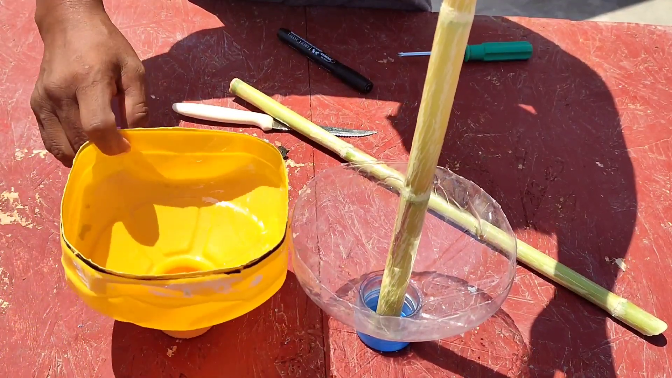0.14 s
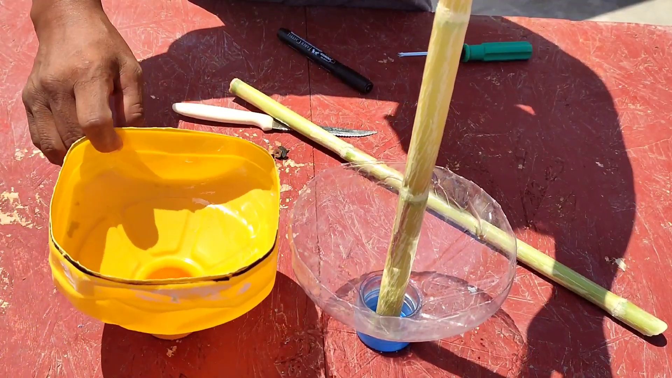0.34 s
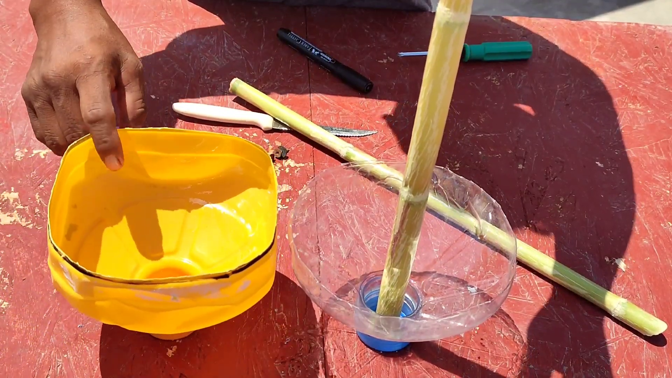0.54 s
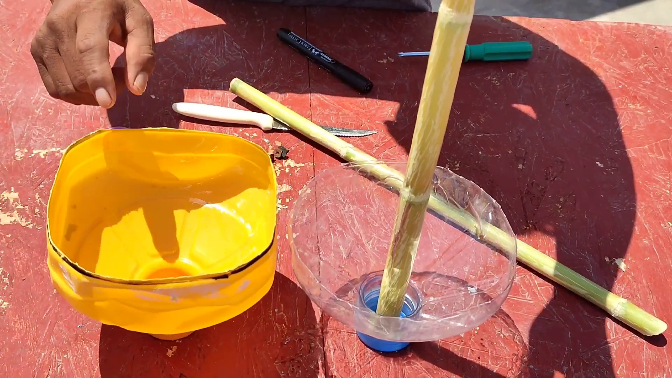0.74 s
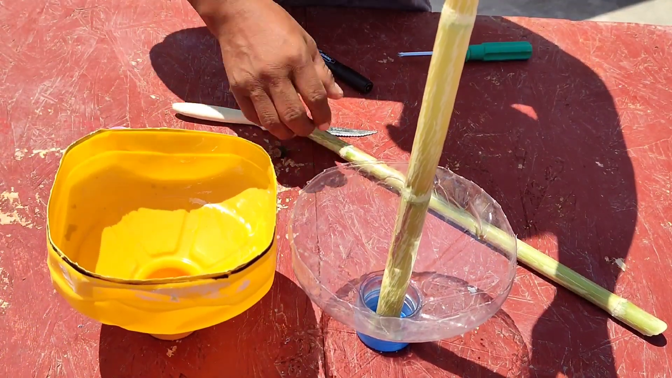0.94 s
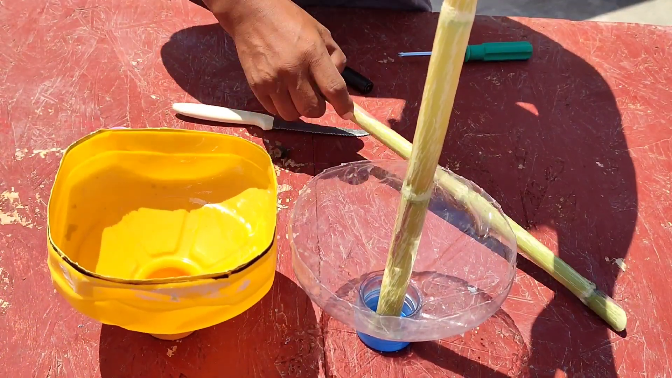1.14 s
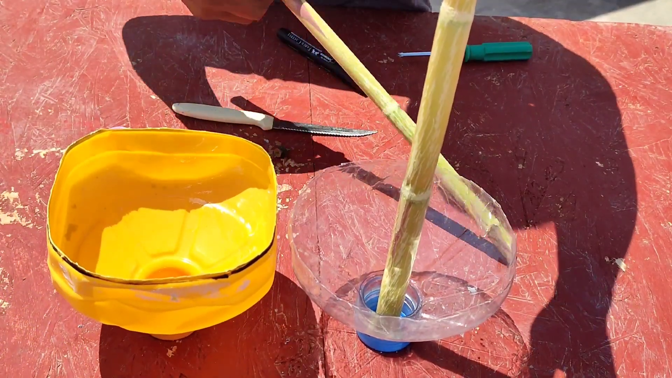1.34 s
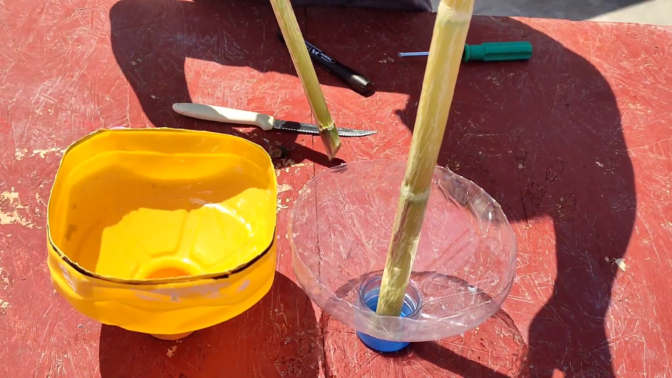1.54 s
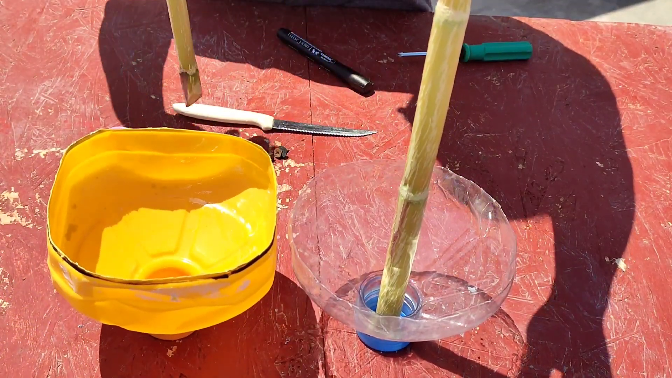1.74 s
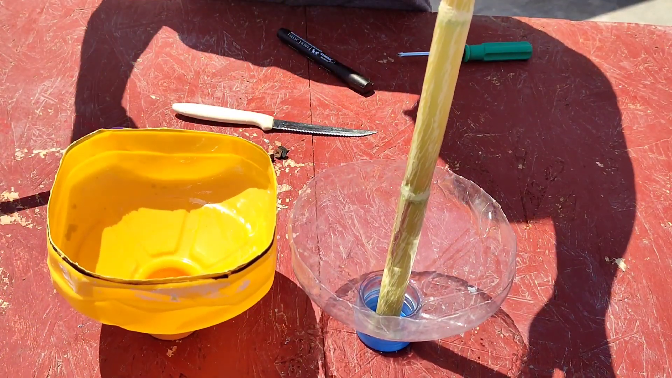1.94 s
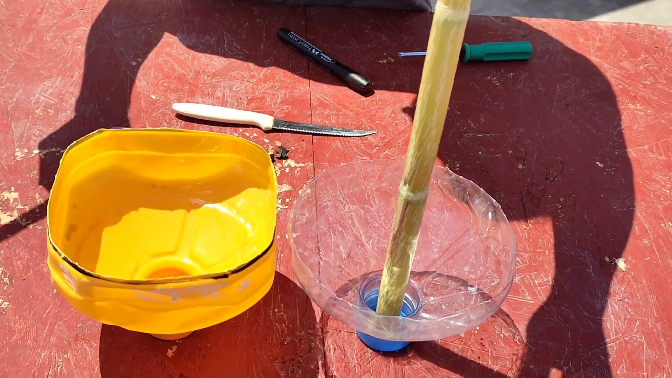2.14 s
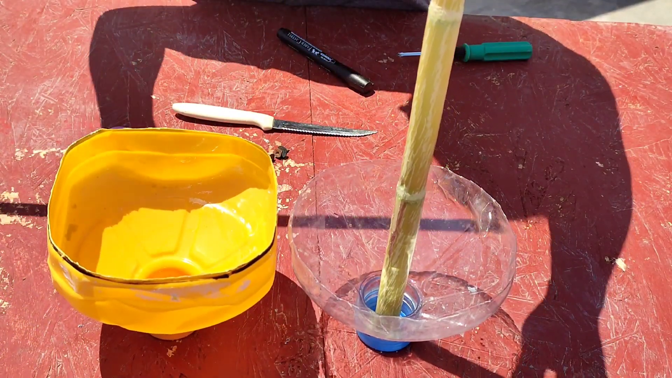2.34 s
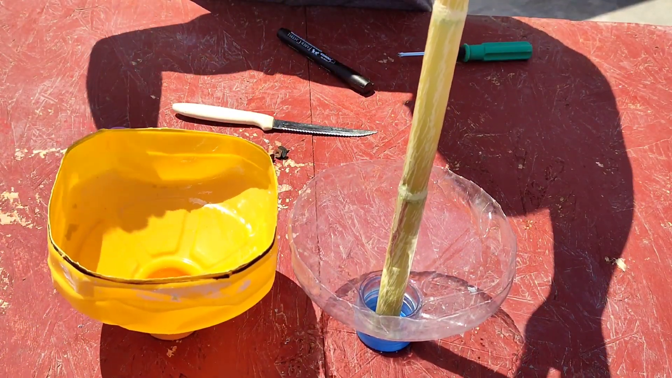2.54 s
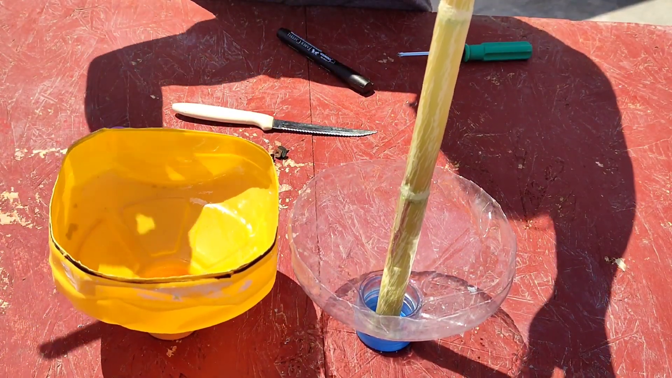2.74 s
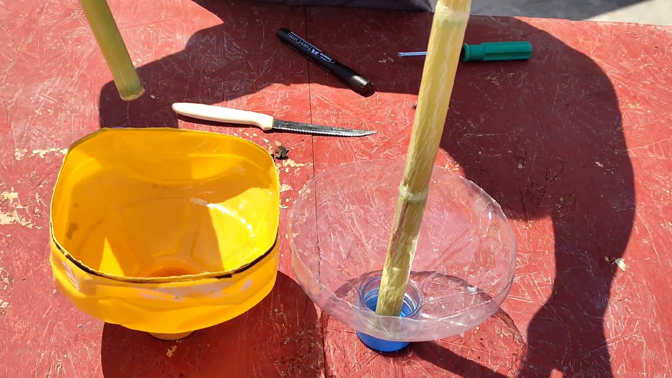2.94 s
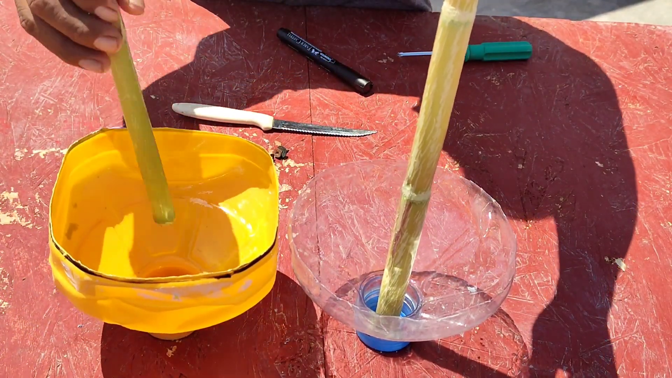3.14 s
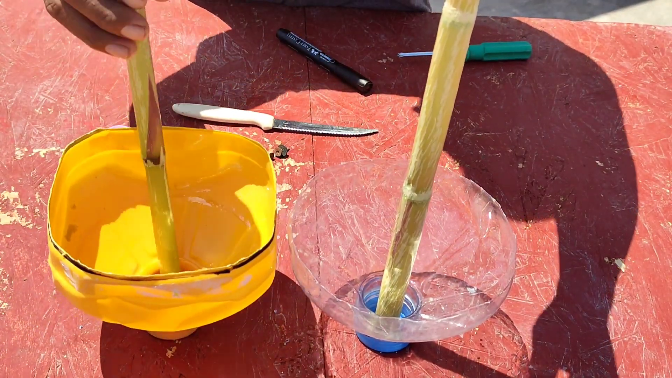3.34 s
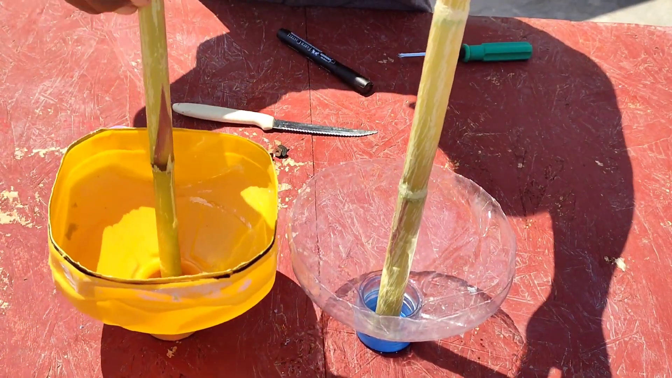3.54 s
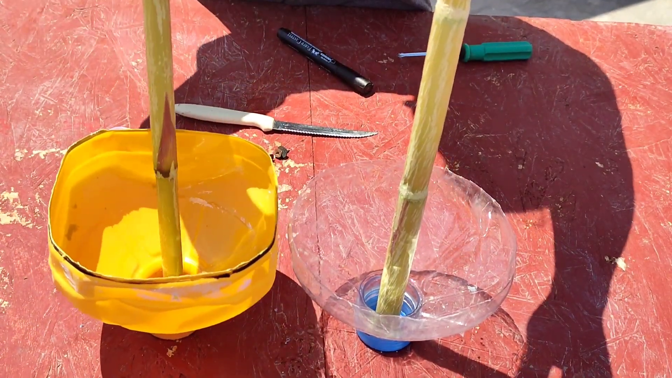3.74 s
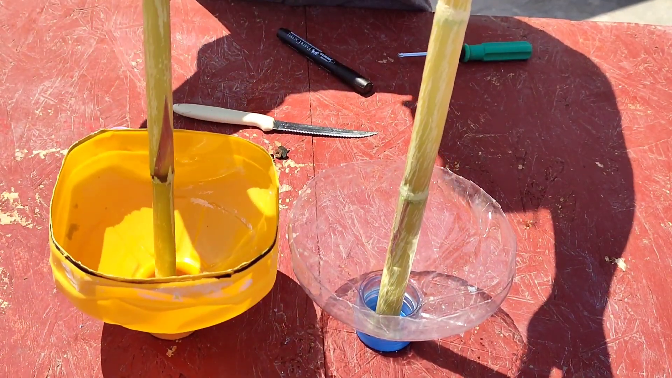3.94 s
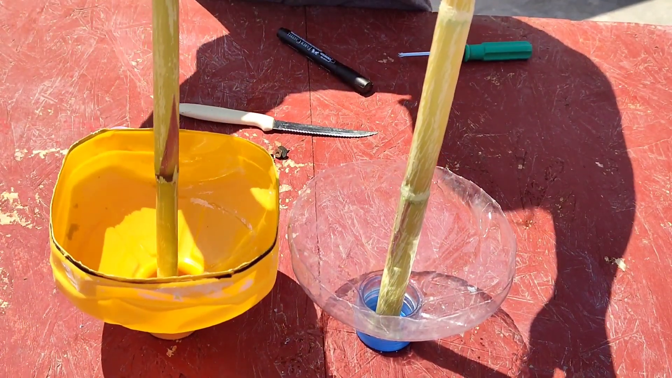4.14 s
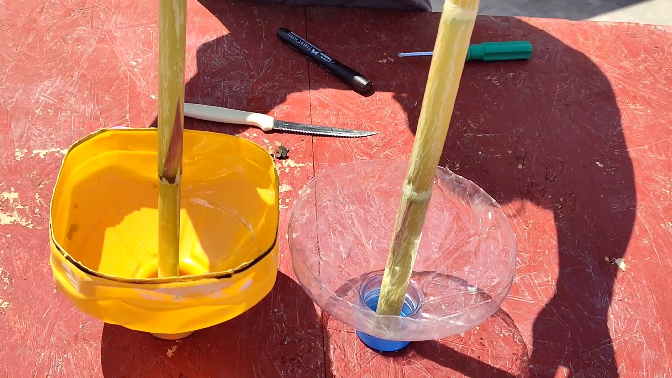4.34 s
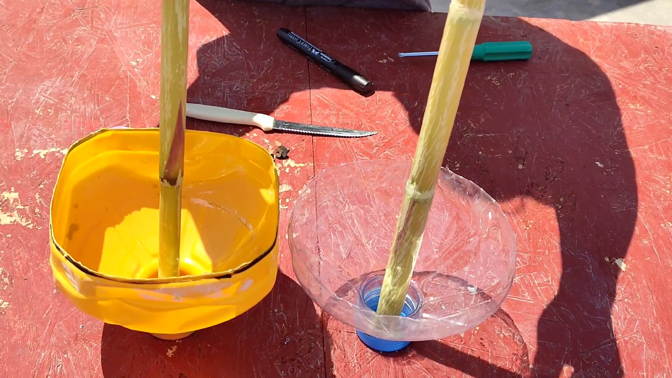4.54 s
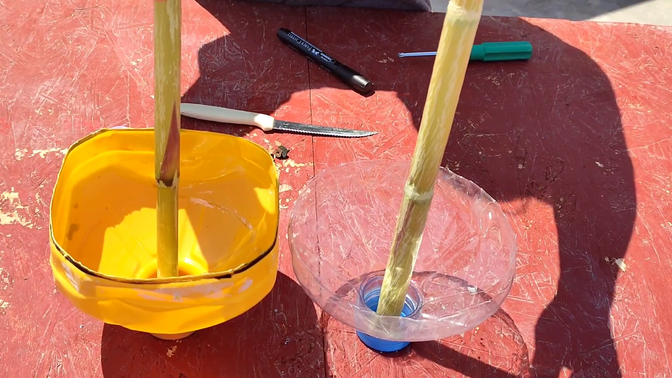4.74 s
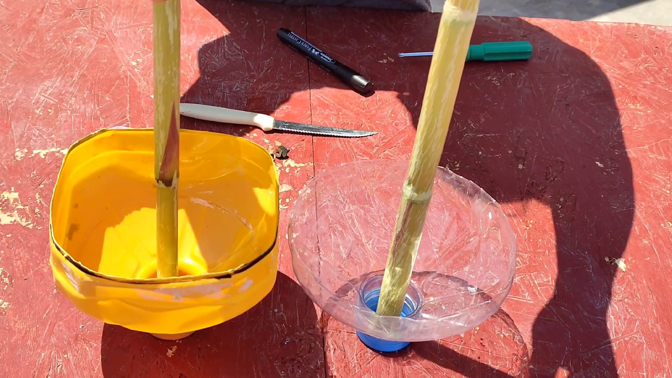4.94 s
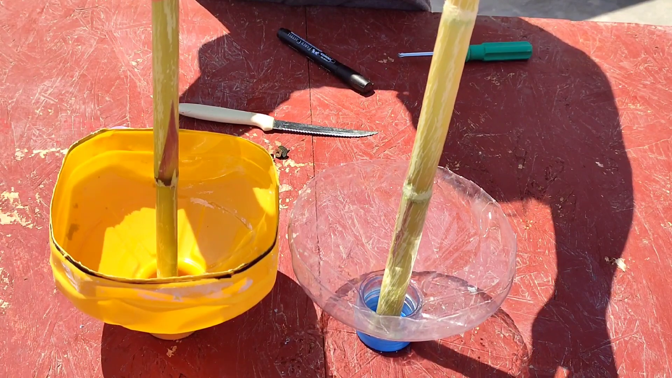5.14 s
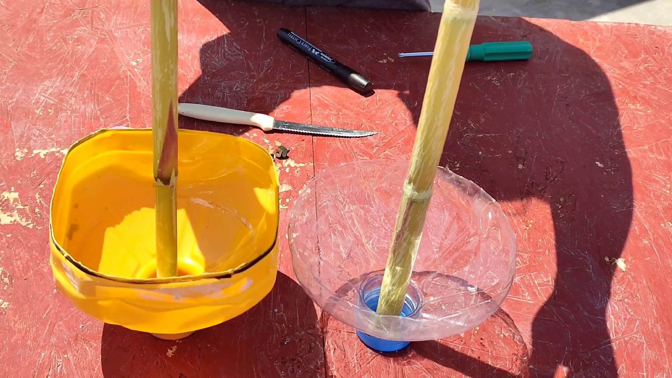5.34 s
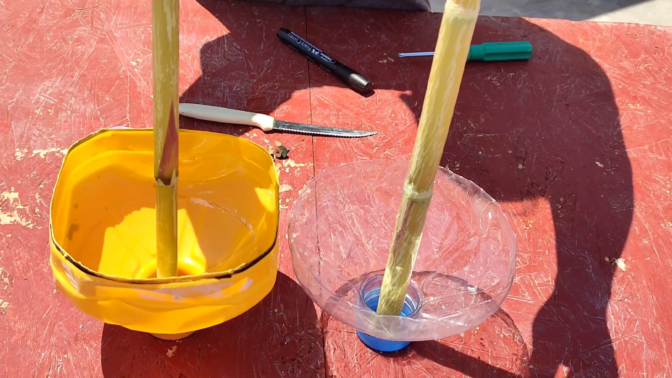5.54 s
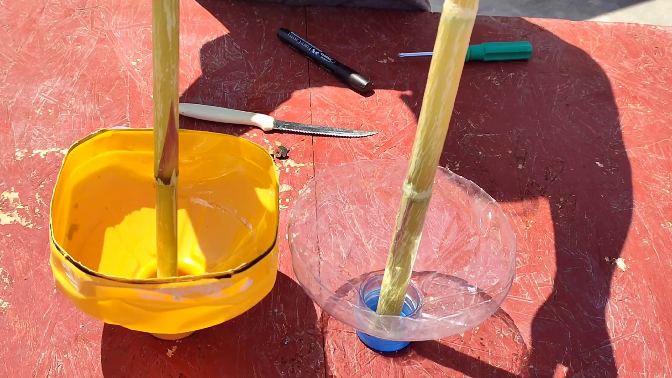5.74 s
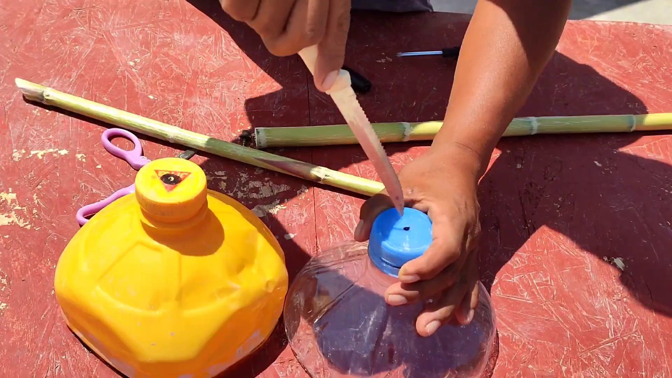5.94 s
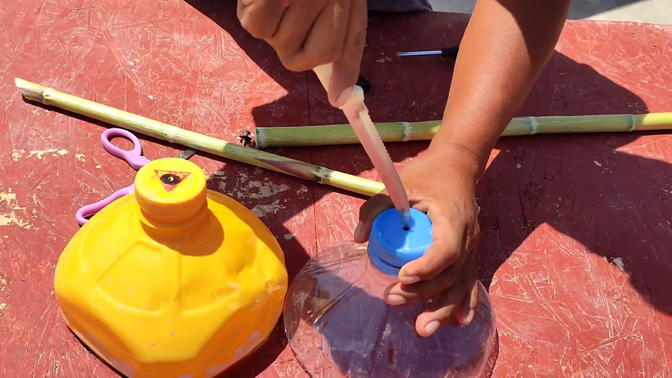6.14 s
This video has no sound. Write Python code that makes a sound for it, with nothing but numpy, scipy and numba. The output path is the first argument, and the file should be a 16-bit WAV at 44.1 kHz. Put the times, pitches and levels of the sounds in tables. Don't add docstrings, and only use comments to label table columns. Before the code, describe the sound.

In an open yard, hens give quick runs of short clucks, each building to a loud hoarse squawk with a clear held note. On a table close by, small taps and scrapes are heard, then a cane knocks once, sharply, in a cut plastic bottle and chatters briefly. Wind thumps low on a handheld phone's stereo microphones; sound drops out momentarily near the end.

```python
import sys
import numpy as np
from scipy import signal
from scipy.fft import rfft, irfft
from scipy.io import wavfile
from scipy.ndimage import uniform_filter1d, map_coordinates
from numba import njit

SR = 44100
rng = np.random.default_rng(int(sys.argv[2]) if len(sys.argv) > 2 else 0)


def volts_from_decibels(level):
    exponent = np.asarray(level, float) / 20
    return 10 ** exponent


def digitize_waveform(pressure):
    field = np.atleast_2d(pressure).T
    bounded = np.clip(field, -1, 1)
    quanta = np.round(bounded * 32767).astype(np.int16)
    wavfile.write(sys.argv[1], SR, quanta)


N = 272097
T = np.arange(N) / SR


def level(x, db=0):
    return x * volts_from_decibels(db) / np.sqrt(np.mean(x ** 2, axis=-1, keepdims=True))


def curves(spans):
    rows = np.concatenate(spans)
    gate = sum((T > s[0][0]) & (T < s[-1][0]) for s in spans)
    columns = [np.interp(T, rows[:, 0], column) for column in rows.T[1:]]
    return columns + [uniform_filter1d(1. * gate, size=400)]


def swell(start, length, rise, fall):
    end = start + max(length, rise)
    return np.interp(T, [start, start + rise, end, end + fall], [0, 1, 1, 0])


def band(x, lo_hz, hi_hz, order=2):
    return signal.sosfilt(signal.butter(order, [lo_hz, hi_hz], "band", fs=SR, output="sos"), x)


def noise(channels=1):
    return np.squeeze(rng.standard_normal((channels, N)))


def walk(rate_hz):
    hold = int(SR / rate_hz)
    steps = np.repeat(rng.standard_normal(N // hold + 1), hold)
    return 1.9 * uniform_filter1d(steps, hold)[:N]


@njit
def ring(x, hz, width):
    y, b, l = np.empty(len(x)), 0., 0.
    for i in range(len(x)):
        g, k = np.tan(np.pi * hz[i] / SR), width / hz[i]
        v = (b + g * (x[i] - l)) / (1 + g * (g + k))
        b, l, y[i] = 2 * v - b, l + 2 * g * v, k * v
    return y


def tract(x, modes):
    out = 0
    for hz, width_hz, db in modes:
        g = np.tan(np.pi * hz / SR)
        k = g * width_hz / hz
        pole = np.array([k, 0, -k, 1 + k + g * g, 2 * (g * g - 1), 1 - k + g * g]) / (1 + k + g * g)
        out = out + volts_from_decibels(db) * signal.sosfilt([pole, pole], x)
    return out


def beak(x, modes, scale):
    top = band(x, 1300, 15000, order=3)
    out = 0
    for k, (hz, width_hz, db) in enumerate(modes):
        out = out + (-1) ** k * volts_from_decibels(db + 1.0 * walk(22)) * ring(top, hz * scale, 1. * width_hz)
    return level(out)


def glottis(hz, rough, uneven):
    step = hz * (1 + .05 * rough * walk(90) + .1 * rough * walk(260)) / SR
    phase = np.cumsum(step)
    cycle = phase.astype(int)
    scatter = np.clip(rng.standard_normal(N // 40), -1.5, 1.5)[cycle]
    size = volts_from_decibels(4 * rough * scatter) * (1 - np.clip(uneven, 0, 1) * (cycle % 2))
    pulse = np.clip(1 - abs(phase - np.round(phase)) / step, 0, 1)
    breath = .22 * rough * np.exp(-(phase - cycle) / .4) * noise()
    return size * (pulse + breath)


# start in
# s, length in s, level in dB, leading (third) overtone in Hz, treble in dB.
NARROW_CLUCKS = [(-.03, 0.053, -74.5, 700, 2), (.058, 0.056, -55.5, 695, -12.5),
                 (.135, 0.05, -63, 649.3, -14), (.197, 0.037, -57.5, 713.3, -13),
                 (.327, 0.041, -59.5, 721.5, -14.5), (.465, 0.034, -57, 703, -14.5),
                 (.612, 0.05, -60.5, 656, -26), (.745, 0.049, -54.5, 704, -16.5),
                 (2.385, 0.063, -63.5, 705.3, -17), (2.528, 0.05, -57.5, 685, -17),
                 (2.672, 0.046, -55.5, 709, -18.5), (2.811, 0.047, -56, 703.4, -16),
                 (2.948, 0.058, -55, 738, -24), (6.098, 0.039, -52.5, 786, -19.5)]
OPEN_CLUCKS = [(1.238, .03, -54, 687, -6.5), (3.765, .05, -58.5, 694.3, -6.5),
               (3.892, 0.052, -52, 742, -15.5), (4.058, 0.063, -56.5, 676.6, -15),
               (4.228, 0.053, -56, 715.6, -16), (4.416, 0.043, -56.5, 668, -21.5),
               (4.562, 0.051, -56, 709.2, -15), (4.691, 0.059, -53.5, 726, -12),
               (4.822, 0.053, -54.5, 720, -11), (4.959, 0.059, -54.5, 745, -10.5),
               (5.096, 0.058, -54.5, 697, -13), (5.226, 0.06, -54, 709, -18),
               (5.385, 0.045, -53, 684.3, -17), (5.822, 0.049, -55, 679.5, -8.5)]
# centre in Hz, width in Hz, level in dB.
NARROW_THROAT = [(330, 230, 1), (530, 49, 7), (712, 220, 9.5), (970, 100, -5.5), (1390, 560, -15.5)]
OPEN_THROAT = [(250, 73, -2), (477, 180, 4.5), (700, 125, 10), (920, 182, 6.5), (1060, 49, -14.5)]
BEAK = [(1510, 520, 8.5), (1950, 380, 11), (2570, 450, 6), (3000, 500, 1), (3400, 260, 3),
        (3900, 570, -4.5), (4500, 550, -8), (5500, 980, -12.5), (7400, 2000, -8), (11200, 3600, -26)]


def clucks(table, throat, rough):
    arch, sag_db = 0.61, 1.5
    hz, body, treble = np.full(N, 300.), np.zeros(N), np.zeros(N)
    for s, length, db, lead_hz, treble_db in table:
        part = np.clip((T - s) / length, -.2, 1.2)
        hz = np.where(T > s - .02, lead_hz / 3 * (1.04 - arch * (part - .7) ** 2), hz)
        body += volts_from_decibels(db - sag_db * part) * swell(s, length, rise=.007, fall=.014)
        treble += volts_from_decibels(db + treble_db) * swell(s + .1 * length, .85 * length, .25 * length, 0.3 * length)
    voice = glottis(hz, rough, uneven=.35) * volts_from_decibels(1.2 * walk(80))
    bright = beak(level(voice) + .4 * noise(), BEAK, 1 + 0.033 * walk(7.7))
    return body * level(tract(voice, throat)) + treble * bright


# time in s, throat in Hz, level in dB, beak opening as treble in dB,
# main beak resonance in Hz.
SQUAWKS = [
    [(0.795, 1100, -54, -18, 3860), (0.817, 1140, -49, -16, 3770), (0.901, 920, -51, -15.5, 3370),
     (0.965, 955, -54, 0.5, 3340), (1.005, 1080, -45.5, -13.5, 3400), (1.101, 1130, -61.5, -13, 3630),
     (1.131, 1100, -56, -7.5, 3600), (1.2, 1010, -67, -2.5, 3700)],
    [(3.335, 1150, -56, -21, 3700), (3.353, 1100, -52.5, -13, 3650), (3.383, 910, -58, -7, 3645),
     (3.485, 876, -49, -11.5, 3386), (3.535, 1104, -49.5, -8.5, 3440), (3.657, 970.5, -58, -12, 3540),
     (3.699, 1205, -55, -21, 3300), (3.75, 1100, -68, -18, 3310)],
    [(5.305, 1100, -73, -10, 3800), (5.323, 1144, -51.5, -18, 3743), (5.397, 1021, -51, -14, 3443),
     (5.439, 1014, -56.5, -9, 3455), (5.475, 979, -51.5, -17.5, 3360), (5.547, 955.4, -53.5, -4, 3280),
     (5.571, 943, -63.5, 9, 3237), (5.63, 1200, -61.5, -7, 3620)],
]
# centre in Hz, width in Hz, level in dB.
WIDE_BEAK = [(1540, 630, 4.5), (2000, 200, 8.5), (2670, 400, 2.5), (3650, 540, 4), (4320, 510, 1.5),
             (4770, 660, -3.5), (6200, 700, -6), (7070, 420, -3.5), (7820, 800, -2.5), (9700, 1800, -13),
             (11900, 4200, -19.5)]


def squawks():
    full_voice_hz, idle_hz, beak_rest_hz, throat_width_hz = 575, 308, 3650, 340.0
    throat_hz, db, treble_db, beak_hz, gate = curves(SQUAWKS)
    note_hz, *_, singing = curves(sorted(NOTES + NOTE_ENDS))
    locked = (singing > .5) & (note_hz > full_voice_hz)
    hz = np.where(locked, note_hz / 2, idle_hz * (1 + 0.023 * walk(12)))
    voice = glottis(uniform_filter1d(hz, size=300), rough=.14, uneven=.5)
    throat = ring(ring(voice, throat_hz, throat_width_hz), throat_hz, throat_width_hz)
    breath = level(voice) + volts_from_decibels(-16 + 1.3 * walk(20)) * noise()
    hoarse = beak(breath, WIDE_BEAK, beak_hz / beak_rest_hz)
    return gate * volts_from_decibels(db) * (level(throat) + volts_from_decibels(treble_db) * hoarse)


# time in s, pitch in Hz, level in dB, octave in dB.
NOTES = [
    [(0.9, 511.5, -55, -66), (0.924, 505.6, -57, -48), (0.952, 612, -46, -53), (0.964, 622, -46, -78),
     (1.032, 591, -52.5, -52), (1.108, 591.4, -54.5, -50), (1.158, 621.6, -50, -73), (1.2, 612, -71, -72)],
    [(3.43, 530, -69, -80), (3.448, 541.7, -51.5, -53), (3.474, 546.7, -57, -45), (3.49, 616.3, -50, -74),
     (3.516, 629.3, -43.5, -49), (3.612, 611.4, -49, -74), (3.674, 619.5, -41.5, -66),
     (3.744, 636.7, -58.5, -73), (3.755, 665, -78, -79.5)],
    [(5.5, 573, -79, -53), (5.53, 548.6, -49, -59), (5.572, 618, -45.5, -61), (5.658, 587, -61, -50),
     (5.718, 590.3, -69.5, -49), (5.74, 602.6, -44, -61), (5.76, 599.3, -38.5, -62)],
]
NOTE_ENDS = [
    [(3.756, 532, -64, -70), (3.775, 545, -42, -55), (3.81, 545, -48, -59), (3.835, 520, -66, -70)],
    [(5.815, 625, -51, -56), (5.838, 617, -48, -54), (5.86, 612, -55, -66), (5.885, 600, -70, -80)],
]
# multiple of the pitch, level in dB.
OVERTONES = [(3, -20), (4, -19), (5, -25.5), (6, -24), (7, -29.5), (8, -30.5), (9, -39), (10, -39),
             (11, -49), (12, -33.5), (13, -35), (14, -46)]


def notes():
    half_share, upper_db = 0.084, -17
    throb_depth_db, throb_period_s, throb_peak_s = 2, .07, 0.087
    hz, db, octave_db, gate = curves(sorted(NOTES + NOTE_ENDS))
    turn = 2 * np.pi * np.cumsum(hz * (1 + 0.004 * walk(45))) / SR
    upper = 0
    for k, overtone_db in OVERTONES:
        waver = .045 * k * walk(150)
        upper = upper + volts_from_decibels(overtone_db + 1.5 * walk(30)) * np.sin(k * turn + waver)
    upper = level(upper) + volts_from_decibels(-14) * beak(noise(), WIDE_BEAK, hz / 600)
    upper *= np.clip((hz - 500) / 90, .1, 1) * (1 + 3 * half_share * np.cos(turn / 2))
    stack = volts_from_decibels(db) * np.sin(turn) + volts_from_decibels(octave_db) * np.sin(2 * turn)
    stack += volts_from_decibels(np.maximum(db - 5, octave_db) + upper_db) * upper
    starts, ends = np.array([n[0][0] for n in NOTES]), [n[-1][0] for n in NOTES[:-1]]
    age = T - starts[np.searchsorted(ends, T)]
    throb_db = throb_depth_db * np.cos(2 * np.pi * (age - throb_peak_s) / throb_period_s)
    dip = 1 + half_share * np.cos(turn / 2)
    return np.sqrt(2) * gate * stack * volts_from_decibels(throb_db + 1.3 * walk(50)) * dip


# start in s, length in s, pitch in Hz, level in dB.
PEEP = [
    (.41, .045, 1452, -72),
    (.265, .035, 1250, -73),
]


def peep():
    out = np.zeros(N)
    for s, length, hz, db in PEEP:
        out += volts_from_decibels(db) * np.sqrt(2) * swell(s, length, .01, .012) * np.sin(2 * np.pi * hz * T)
    return out


def hens_at_ports(x):
    lag_samples = 13 + 1.8 * walk(5.5)
    left = map_coordinates(x, [np.arange(N) - lag_samples], mode="nearest")
    age, t60_s = T[:SR // 50], .02
    scatter = band(rng.standard_normal((2, SR // 50)), 1200, 13000, order=1) * volts_from_decibels(-60 * age / t60_s)
    scatter *= volts_from_decibels(-2) / np.sqrt((scatter ** 2).sum(axis=1, keepdims=True))
    direct = np.array([left * volts_from_decibels(0.5), x * volts_from_decibels(2.97)])
    return direct + signal.fftconvolve(x[None], scatter, axes=1)[:, :N]


# frequency in Hz, level in dB, t60 in s.
BOTTLE = [(211.5, -6, 0.11), (345, -5, 0.11), (670, 3, 0.038), (1070, -13, 0.065), (1496, -9.5, 0.05),
          (1670, -14.5, 0.04), (1845, -11, 0.031), (1950, 3.5, 0.008), (1980, -16, 0.05), (2260, -7, 0.04),
          (2520, -31, 0.04)]
TABLE_TOP = [(130.6, -13.5, 0.15), (455, -2.5, 0.053), (798, -12.5, 0.079), (1860, -16, 0.029),
             (2210, -14.5, 0.015)]
# time in s, body in dB, scrape in dB, length in s.
BOUNCES = [
    (3.0513, -1, -26, 0.00076),
    (3.06, -13.5, -36.5, 0.0044),
    (3.069, -39, -40, 0.0045),
    (3.083, -21, -32, 0.0071),
    (3.099, -27.5, -47.5, 0.006),
    (3.109, -33, -50.5, 0.004),
    (3.115, -30, -34.5, 0.0065),
    (3.126, -39, -49, 0.002),
    (3.138, -31.5, -43.5, 0.0049),
]


def bottle():
    knock_s, rebound_s = 3.0521, .0011
    age = T[:SR // 4]
    wall = sum(volts_from_decibels(db) * np.sin(2 * np.pi * hz * age) * volts_from_decibels(-60 * age / t60) for hz, db, t60 in BOTTLE + TABLE_TOP)
    blow = np.exp(-((T - knock_s) / .0001) ** 2)
    knock = -band(signal.fftconvolve(blow, wall)[:N], 27, 2100)
    puff = .8 * np.exp(-((T - knock_s - rebound_s) / .0002) ** 2)
    knock = knock / abs(knock).max() + puff
    touches = noise() * (rng.random(N) < .25)
    chatter = band(signal.fftconvolve(touches, wall * volts_from_decibels(-1500 * age))[:N], 110, 500, order=1)
    body, scrape = np.zeros(N), np.zeros(N)
    for s, db, scrape_db, length in BOUNCES:
        contact = np.clip((T - s) / 0.0048 + 1, 0, 1) * np.clip((s + length - T) / 0.0055 + 1, 0, 1)
        body += volts_from_decibels(db - 7) * contact * (s > knock_s + .005)
        scrape += volts_from_decibels(scrape_db - 11.0) * contact
    return volts_from_decibels(-1.6) * knock + body * level(chatter), scrape


def scrape_hiss():
    # centre in Hz, width in Hz, level in dB
    grain = [(3480, 1300, 5.0), (6300, 2000, 6.0), (7360, 2600, 5.5), (9600, 2200, -1.5),
             (11900, 2600, 2), (13800, 1800, -1.5), (2300, 1200, 4.5), (4890, 960, 5.5)]
    both = tract(noise(), grain)
    return level(np.array([both + 1.6 * tract(noise(), grain), both + 1.6 * tract(noise(), grain)]))


# time in s, peak in dB, ring in Hz, tick in dB.
TAPS = [(0.753, -42, 250, -42), (1.139, -61, 400, -2), (1.24, -52, 403, -5), (1.192, -47, 345, -17),
        (1.2143, -45.5, 358, -13), (1.267, -54, 250, -8), (1.2957, -52, 352, 0), (1.344, -58, 366, 0),
        (3.181, -51.5, 374, -39.5), (3.273, -60, 385, -24), (3.339, -50.5, 332, -61),
        (3.645, -44, 330, -19), (3.646, -51, 1810, -16), (3.653, -46, 306, -30), (3.337, -55.5, 700, -23),
        (5.897, -41, 457.5, -28), (5.822, -50, 520, -14)]
KNIFE = [
    (5.9556, -47, 710, -40),
    (5.9582, -47.5, 1760, -5.5),
]
# centre in Hz, width in Hz, level in dB.
TICK = [(1700, 700, 0), (2870, 500, 6.5), (3700, 490, 6.5), (5500, 1200, 3), (6830, 1100, 10),
        (8200, 1600, -1), (9600, 1300, -5), (13300, 2600, -9.5)]


def taps():
    out, tick = np.zeros(N), beak(noise(), TICK, np.ones(N))
    for s, db, hz, tick_db in TAPS + KNIFE:
        age = np.clip(T - s, 0, None)
        tone = np.sin(2 * np.pi * hz * age) * np.exp(-age / 0.0023)
        thud = .5 * np.sin(2 * np.pi * 280 * age) * np.exp(-age / 0.00044)
        click = volts_from_decibels(tick_db) * tick * swell(s, 0.0026, 0.0008, 0.0056)
        out += volts_from_decibels(db) * (3.16 * (tone - thud) + click)
    return out


# start in s, length in s, level in dB.
DRAG = [
    (1.04, 0.11, -54),
    (1.19, 0.11, -49.5),
    (1.31, 0.074, -61),
    (3.14, 0.032, -53),
    (3.18, 0.13, -56.5),
    (3.335, 0.029, -51),
]
# centre in Hz, width in Hz, level in dB.
CANE = [(138, 145, 9), (345, 80, 8.5), (520, 76, 2.5), (699, 58, 5), (1015, 520, -7), (1800, 3100, -22)]


def drag():
    slips = noise() * (rng.random(N) < .012) * volts_from_decibels(0.44 * walk(32.46))
    slides = sum(volts_from_decibels(db) * swell(s, length, rise=0.0077, fall=0.035) for s, length, db in DRAG)
    return slides * level(tract(slips, CANE))


# start in s, length in s, level in dB.
RUSTLE = [(2.698, 0.024, -74.5), (2.74, 0.049, -75), (3.247, 0.013, -76.5), (3.302, 0.027, -74.5),
          (4.115, 0.02, -71), (4.155, .012, -68.5), (4.182, .022, -69), (4.218, .01, -72.5),
          (4.237, 0.042, -73), (4.544, 0.075, -76), (4.628, .06, -77.5), (5.896, 0.067, -72.5),
          (5.971, 0.13, -79), (6.09, 0.051, -80.5)]
# centre in Hz, width in Hz, level in dB.
CLOTH = [(5450, 1500, 1), (7500, 1600, 2), (10700, 2100, -4.5), (12370, 3300, -4)]


def rustle():
    steps = sum(volts_from_decibels(db) * swell(s, length, .003, 0.021) for s, length, db in RUSTLE)
    flicker = volts_from_decibels(walk(60) + .5 * walk(18))
    hiss = tract(noise() + .5 * noise(channels=2), CLOTH)
    return steps * flicker * level(band(hiss, 4800, 14500, order=3))


# time in s, strength in dB.
WIND = [
    (0, -51),
    (.74, -39.5),
    (1.27, -54),
    (2.18, -46),
    (2.4, -50),
    (2.94, -46),
    (3.45, -52.5),
    (4.84, -50),
    (5.77, -52),
    (6.17, -32.5),
]
# start in s, length in s, rumble in dB, flutter in dB, left minus right in dB.
GUSTS = [(0, 0.051, -42, -62.5, 2), (0.328, 0.1, -42.5, -60.5, 7), (0.554, 0.21, -67, -74, 17),
         (0.73, 0.023, -45, -37, 14), (0.819, 0.11, -43.5, -84, -4), (1.193, 0.14, -80, -50.5, 0),
         (1.593, 0.092, -46.5, -64, -7), (1.86, 0.16, -49, -51.5, -7.5), (2.019, 0.047, -43, -39.5, 23.5),
         (2.077, 0.18, -42, -44.5, -0.5), (2.537, 0.066, -47, -78, -1), (2.682, 0.036, -46, -83, -11),
         (2.812, 0.16, -57.5, -92, 23), (3.087, 0.12, -55.5, -64, -4), (4.189, 0.038, -49.5, -69, 0),
         (4.57, 0.053, -50, -74.5, -11), (4.717, 0.044, -47.5, -84.5, -0.5), (4.838, 0.036, -47.5, -70, 10),
         (4.917, 0.055, -52.5, -82, -4), (5.078, 0.053, -47.5, -83, 14.5), (5.886, 0.066, -32, -54, 5),
         (5.994, 0.095, -42.5, -49.5, 0.5), (6.108, 0.054, -38.5, -36, -7.5)]
# time in s, peak in dB, frequency in Hz, left minus right in dB.
PUFFS = [
    (0.749, -34.5, 52, 17),
    (1.952, -39, 116, 24.5),
    (2.041, -25.5, 52, 14),
    (2.549, -31, 56.4, 7),
    (3.641, -36.5, 110, 0),
    (5.929, -33.5, 49.7, 3),
    (6.121, -30, 60.6, 3),
    (6.159, -30.5, 175, -22),
]


def wind():
    db, _ = curves([WIND])
    sides = np.array([[.5], [-.5]])
    air = noise(channels=2) + 0.32 * noise()
    rumble, flutter = volts_from_decibels(db), volts_from_decibels(-81.5 - 5 * (db + 55.5))
    for s, length, rumble_db, flutter_db, pan_db in GUSTS:
        push = volts_from_decibels(sides * pan_db) * swell(s, length, rise=0.019, fall=0.047) ** 2
        rumble = rumble + volts_from_decibels(rumble_db) * push
        flutter = flutter + volts_from_decibels(flutter_db) * push
    eddies = np.array([walk(13), walk(16)])
    out = rumble * volts_from_decibels(1.0 * eddies) * level(band(air, 21, 69.6))
    out += flutter * volts_from_decibels(0.63 * eddies) * level(band(band(air, 49, 160), 27, 320))
    for s, peak_db, hz, pan_db in PUFFS:
        cycles = (T - s) * hz - .35
        out -= volts_from_decibels(peak_db + sides * pan_db) * np.cos(2 * np.pi * cycles) * np.exp(-(cycles / 0.36) ** 2)
    return out


def wall_echo(x):
    age, t60_s = T[:SR // 2], .22
    walls = band(rng.standard_normal((2, SR // 2)), 140, 4200, order=1) * volts_from_decibels(-60 * age / t60_s) * (age > .012)
    walls *= volts_from_decibels(-13.5) / np.sqrt((walls ** 2).sum(axis=1, keepdims=True))
    return signal.fftconvolve(x[None], walls, axes=1)[:, :N]


# frequency in Hz, level in dB per Hz.
YARD = [(150, -5), (250, -7.5), (328, -9), (376, -13), (509, -14), (1060, -18), (1760, -23.5),
        (3180, -27.5), (5950, -34), (7170, -30.5), (9410, -38), (13400, -31), (14400, -35.5)]


def yard():
    hz = np.fft.rfftfreq(N, 1 / SR) + 1
    knot_hz, knot_db = np.array(YARD).T
    colour = volts_from_decibels(np.interp(np.log(hz), np.log(knot_hz), knot_db))
    mid, side = rfft(noise(channels=2)) * colour
    apart = np.clip(1.1 - hz / 16000, .1, 1)
    hush = irfft(mid + apart * side * np.array([[1], [-1]]), N)
    return level(hush, -65.5) * volts_from_decibels(.7 * walk(5))


def scene():
    hens = clucks(NARROW_CLUCKS, NARROW_THROAT, rough=.33) + clucks(OPEN_CLUCKS, OPEN_THROAT, rough=.36)
    hens = hens + squawks() + notes() + peep()
    body, scrape = bottle()
    table = body + taps() + drag()
    near = np.array([np.roll(table, -4), table])
    near = near + scrape * np.array([[1.2], [.9]]) * scrape_hiss() + rustle()
    return hens_at_ports(hens) + near + wall_echo(hens + 0.32 * table) + wind() + yard()


def roll_off(x):
    return signal.sosfilt(signal.butter(12, 14380, fs=SR, output="sos"), x)


def record(dry):
    silent_from_s, silent_to_s, top_hz = 5.7562, 5.822, 14300
    joined = dry * ((T < silent_from_s) | (T > silent_to_s))
    dull = signal.sosfilt(signal.ellip(8, .2, 60, top_hz, fs=SR, output="sos"), joined)
    return roll_off(dull)


dry = scene()
out = record(dry)
digitize_waveform(out)
```